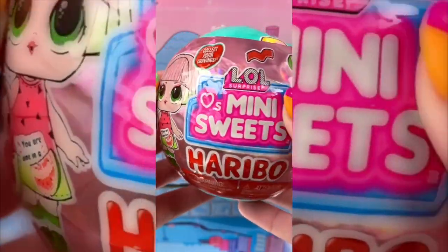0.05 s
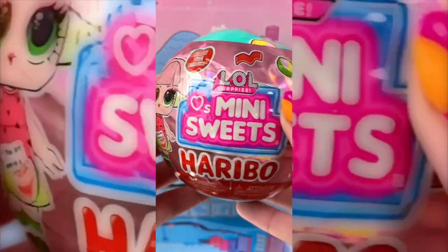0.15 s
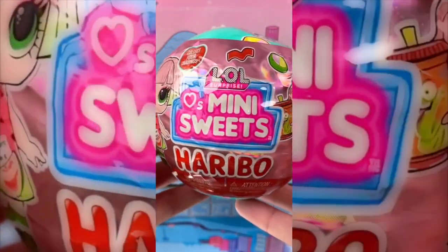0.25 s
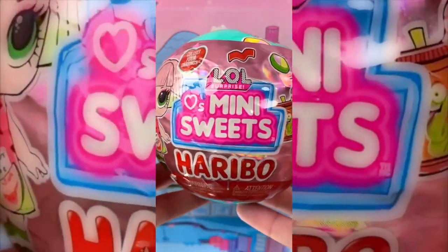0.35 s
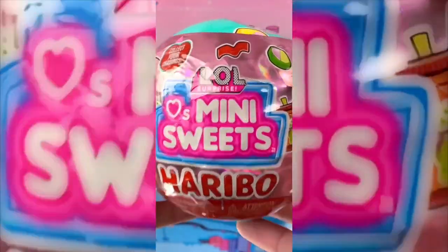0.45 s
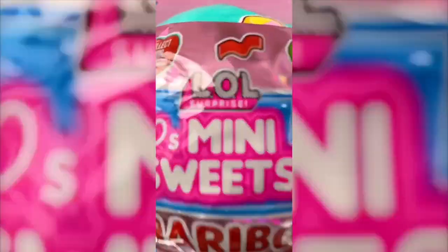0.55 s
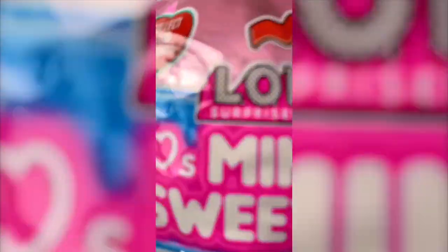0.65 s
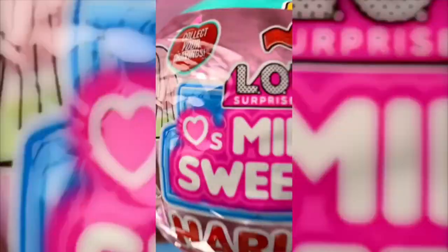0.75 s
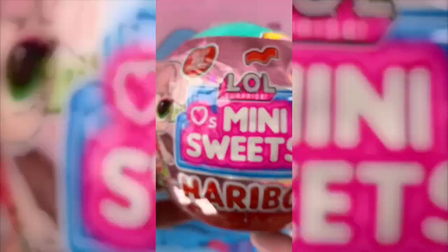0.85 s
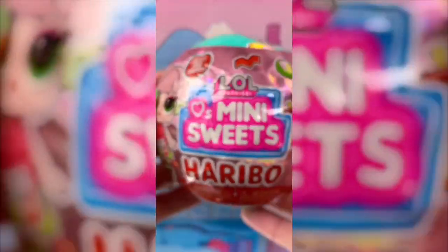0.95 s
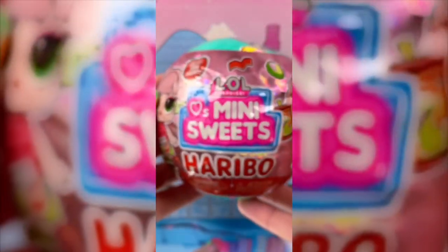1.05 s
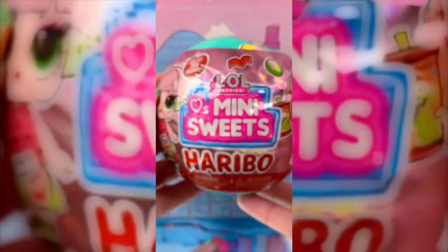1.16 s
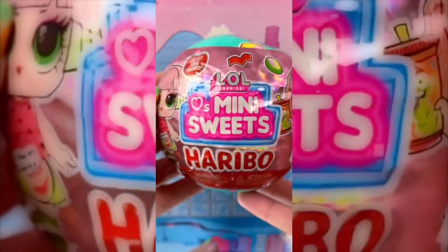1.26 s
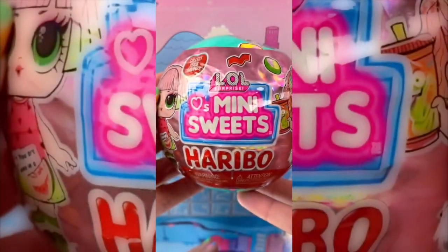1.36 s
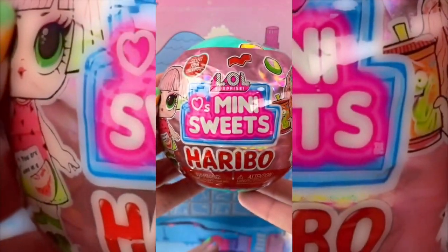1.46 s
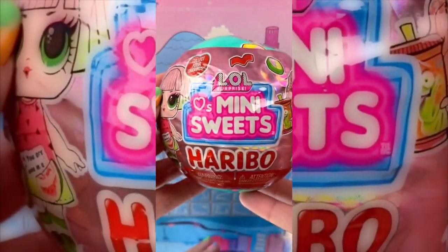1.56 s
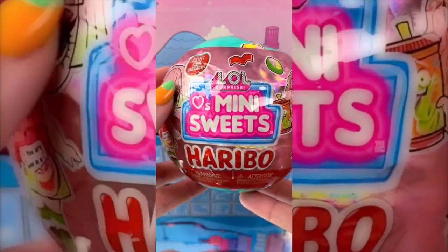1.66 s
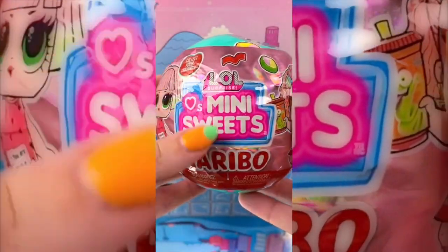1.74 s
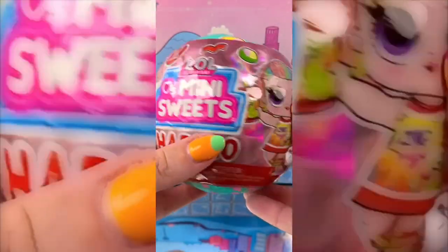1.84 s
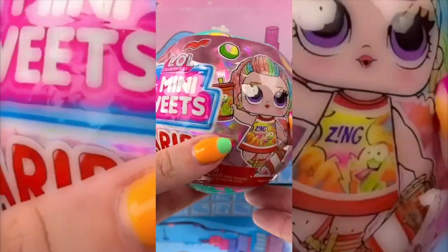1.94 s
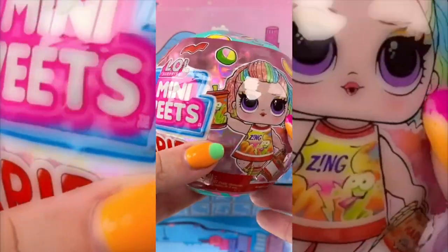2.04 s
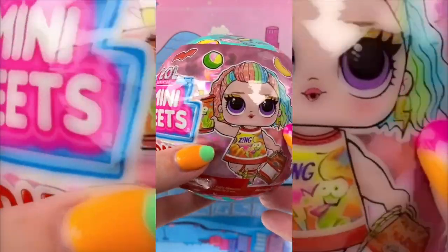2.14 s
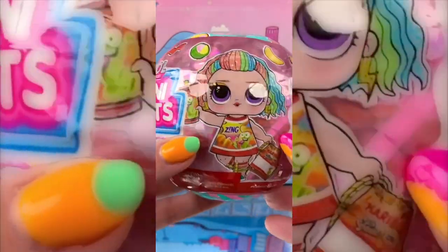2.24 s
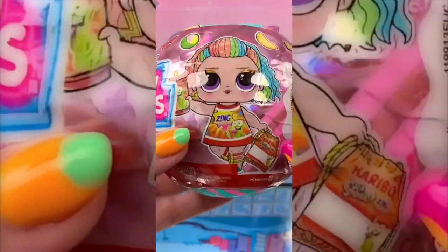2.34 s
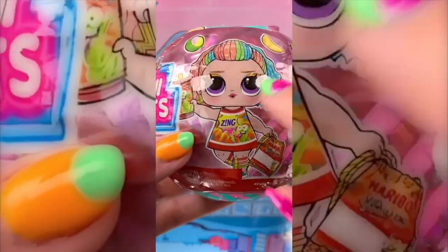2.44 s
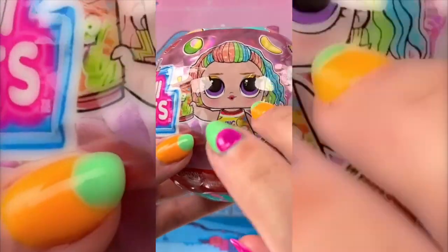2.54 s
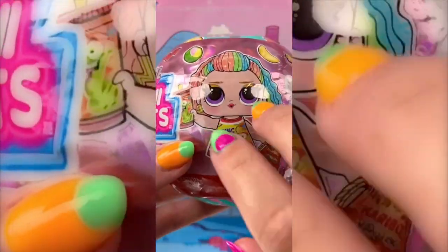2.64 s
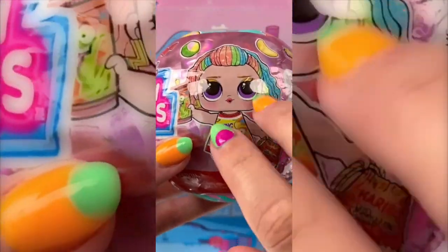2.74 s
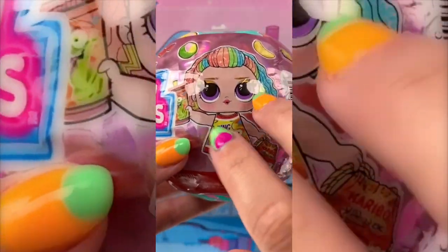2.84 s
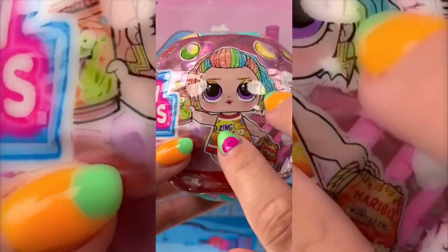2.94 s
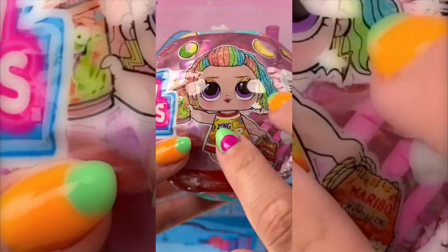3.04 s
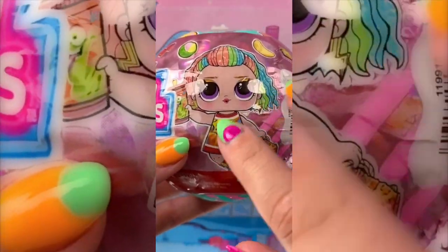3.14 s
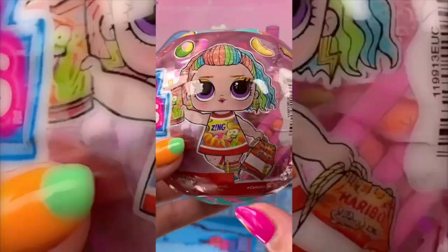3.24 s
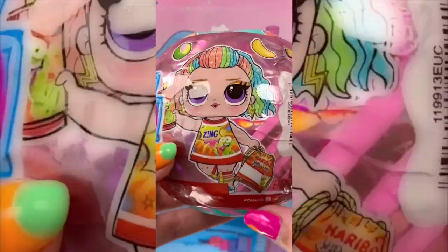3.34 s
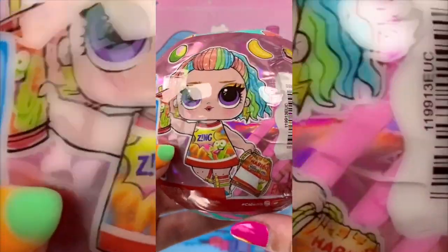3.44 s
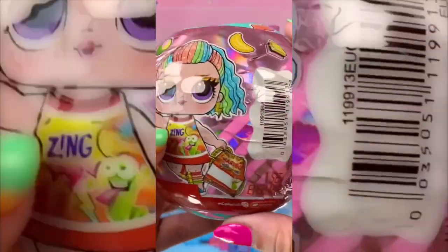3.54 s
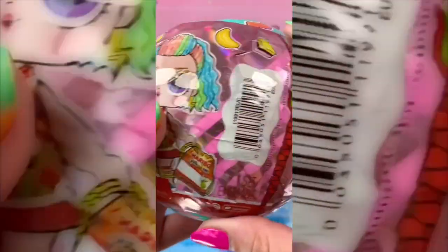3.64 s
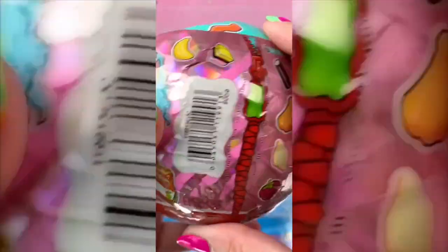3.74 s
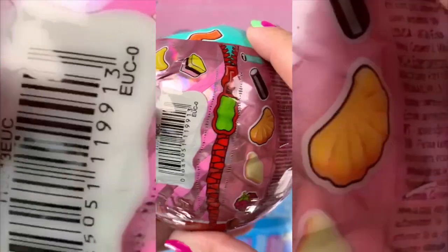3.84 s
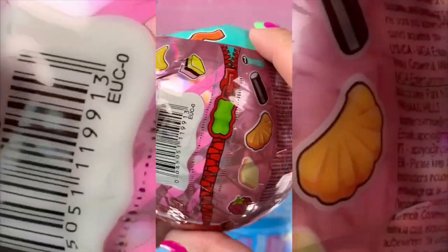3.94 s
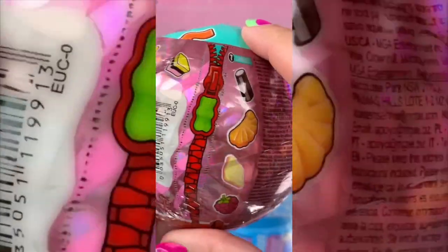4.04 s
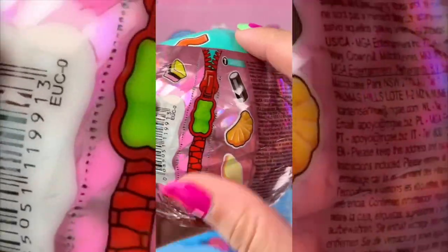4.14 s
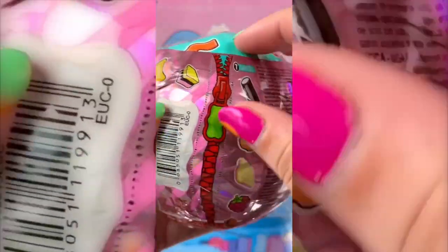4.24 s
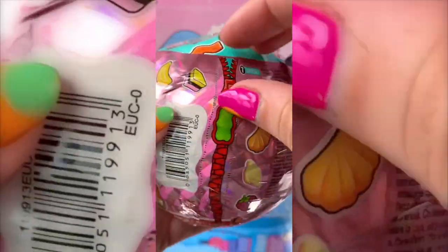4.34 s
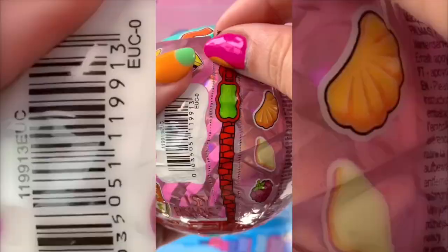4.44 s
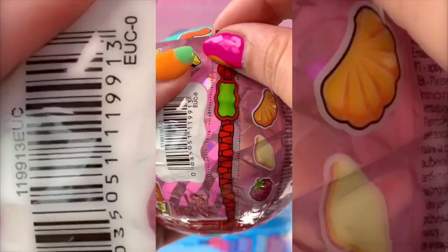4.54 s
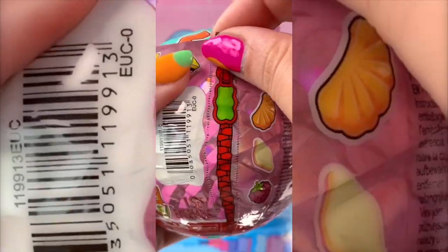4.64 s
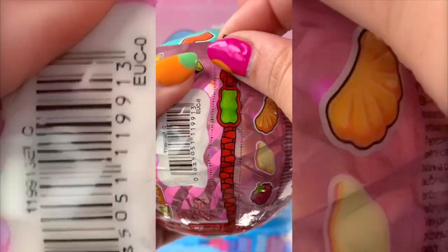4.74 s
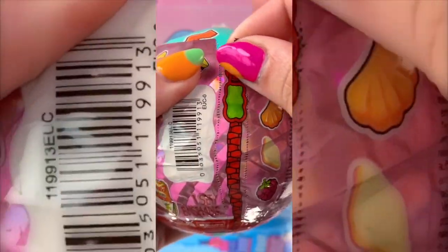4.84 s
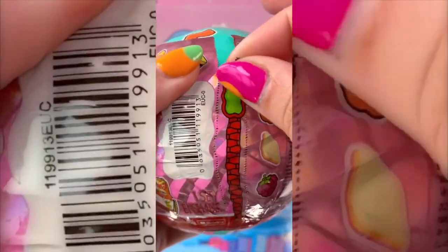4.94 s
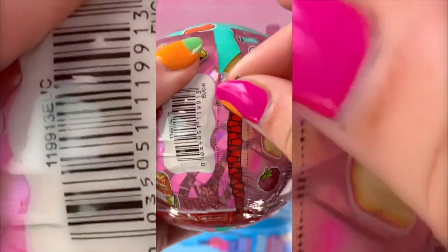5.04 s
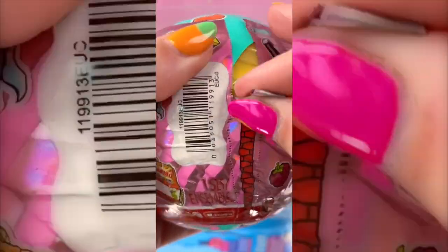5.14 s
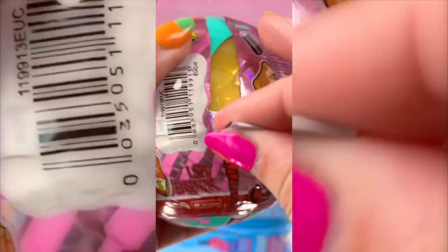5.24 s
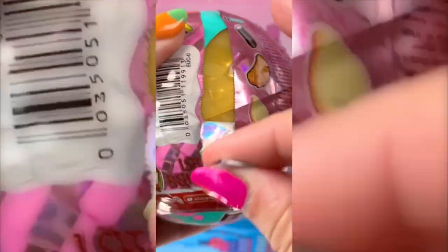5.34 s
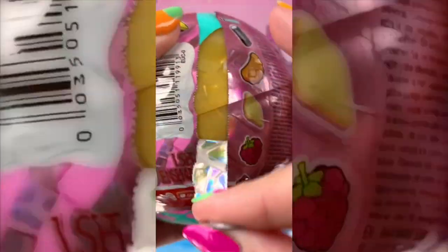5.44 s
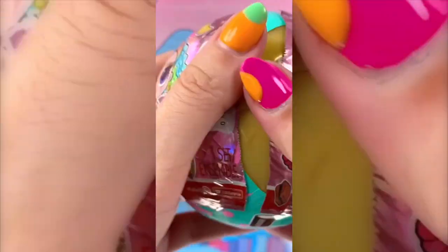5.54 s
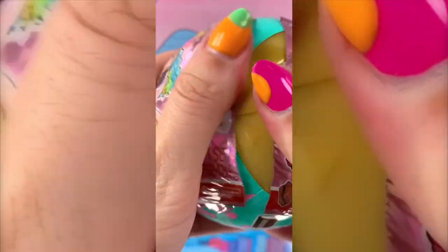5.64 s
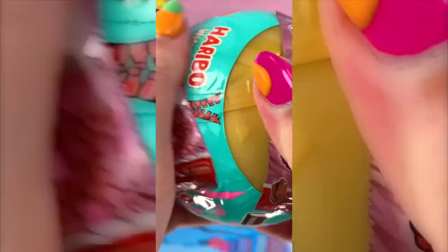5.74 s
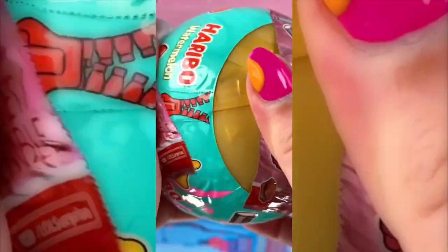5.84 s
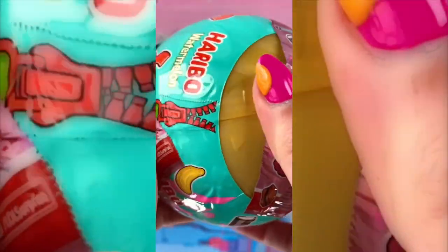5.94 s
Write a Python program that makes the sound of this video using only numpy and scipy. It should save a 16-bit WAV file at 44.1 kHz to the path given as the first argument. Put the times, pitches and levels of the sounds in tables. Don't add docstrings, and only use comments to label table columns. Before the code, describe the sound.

Plastic film faintly rubs and ticks, four hard nail taps ring a hollow ball, then a perforated strip rips open in crackling bursts.

```python
import sys
import numpy as np
from scipy import signal
from scipy.fft import rfft, irfft, next_fast_len
from scipy.io import wavfile
from scipy.ndimage import uniform_filter1d

SR = 44100
rng = np.random.default_rng(int(sys.argv[2]) if len(sys.argv) > 2 else 0)


def pcm_store(signal):
    levels = np.round(np.clip(np.atleast_2d(signal), -1, 1) * 32767)
    wavfile.write(sys.argv[1], SR, levels.astype(np.int16).T)


def to_linear_factor(level_db):
    exponent = np.asarray(level_db, float) / 20
    return 10 ** exponent


N = 264159


def in_time(rows, off=-120):
    s, *columns = np.transpose(rows)
    return [np.interp(np.arange(N) / SR, s, c, left=off, right=off) for c in columns]


def rms_one(x):
    return x / np.sqrt(np.mean(x ** 2) + 1e-20)


def peak_one(x):
    return x / np.sqrt(2 * uniform_filter1d(x ** 2, size=30).max())


def at_hz(points, hz, axis=1):
    points = np.array(points)
    return np.interp(np.log(hz), np.log(points[:, 0]), points[:, axis])


def coloured(points, x, lead=0):
    size = next_fast_len(x.shape[-1] + 8192)
    hz = np.fft.rfftfreq(size, 1 / SR) + 1
    turn = np.exp(1j * lead(hz) if lead else 0)
    return irfft(rfft(x, size) * to_linear_factor(at_hz(points, hz)) * turn, size)[..., :x.shape[-1]]


def cut(x, hz, kind, order=2):
    return signal.sosfilt(signal.butter(order, hz, kind, fs=SR, output="sos"), x)


def resonance(x, hz, width_hz):
    r = np.exp(-np.pi * width_hz / SR)
    gain = (1 - r * r) / 2
    return signal.lfilter([gain, 0, -gain], [1, -2 * r * np.cos(2 * np.pi * hz / SR), r * r], x)


def body(x, modes):
    return sum((-1) ** k * to_linear_factor(db) * resonance(x, hz, width) for k, (hz, width, db) in enumerate(modes))


def drift(rate_hz):
    steps = rng.standard_normal(int(N / SR * rate_hz) + 2)
    return np.interp(np.arange(N) / SR * rate_hz, np.arange(len(steps)), steps)


def swells(rows, rise_s, release_s):
    gains = np.zeros((len(rows[0]) - 2, N))
    for start, end, *dbs in rows:
        span = slice(int(start * SR), min(int((end + 12 * release_s) * SR), N))
        t = np.arange(span.start, span.stop) / SR
        shape = np.clip((t - start) / rise_s, 0, 1) * np.exp(-np.maximum(t - end, 0) / release_s)
        gains[:, span] += to_linear_factor(np.array(dbs))[:, None] * shape
    return gains


def dying_noise(bands, seconds):
    t, out = np.arange(int(seconds * SR)) / SR, 0
    edges = 25 * 2 ** np.arange(0, 9.6, .5)
    white = rng.standard_normal((2, len(t)))
    for k, (low, high) in enumerate(zip(edges, edges[1:])):
        hz = np.sqrt(low * high)
        gain_db = at_hz(bands, hz) - 60 * t / at_hz(bands, hz, axis=2)
        out = out + to_linear_factor(gain_db) * rms_one(cut(white[k % 2], [low, high], "band"))
    return out


def bumps(rows, cycles, puff_db):
    out, t = np.zeros(N + 4000), np.arange(4000) / SR
    for s, db, hz in rows:
        puff = to_linear_factor(puff_db) * cut(rng.standard_normal(len(t)), 3.8 * hz, "low")
        fade = np.exp(-t * hz / cycles) * np.clip(t * hz, 0, 1)
        out[round(s * SR):][:len(t)] += to_linear_factor(db) * (np.sin(2 * np.pi * hz * t) + puff) * fade
    return out[:N]


# time in seconds, level in dB.
RUMBLE = [(0.0, -51), (0.83, -51), (1.72, -49.5), (3.39, -47.5), (3.94, -46.5), (4.6, -50), (4.95, -40.5),
          (5.29, -43.5), (5.41, -57), (5.75, -48), (6.0, -50)]
# frequency in Hz, level in dB per Hz.
RUMBLE_COLOUR = [(12, -50), (20, -23.5), (42, -5.5), (65, 6), (83, 0.5), (97, -16), (125, -4.5), (145, -15),
                 (184, -10.5), (214, -18.5), (246, -17), (334, -28), (550, -54.5), (720, -88.5),
                 (1210, -120)]
# frequency in Hz, width in Hz, level in dB.
HUM = [(59, 3, -61.5), (237.1, 1.5, -69)]
# time in seconds, level in dB.
DRONE = [
    (3.3, -74),
    (3.4, -55),
    (3.8, -52),
    (3.92, -76),
]
# frequency in Hz, level in dB per Hz.
AIR = [(300, -10.5), (450, 33), (600, -14.5), (1200, -15), (3000, -13.5), (8000, -24.5), (16000, -40)]
DRONE_HZ, AIR_DB = 184, -84


def background():
    rumble = rms_one(coloured(RUMBLE_COLOUR, rng.standard_normal(N)))
    hum = sum(to_linear_factor(db) * rms_one(resonance(rng.standard_normal(N), hz, width)) for hz, width, db in HUM)
    drone_phase = 2 * np.pi * np.cumsum(DRONE_HZ + 2.9 * drift(4.9)) / SR
    drone = to_linear_factor(in_time(DRONE)[0] + drift(4.7)) * np.sin(drone_phase)
    air = to_linear_factor(AIR_DB) * rms_one(cut(coloured(AIR, rng.standard_normal(N)), 300, "high"))
    return to_linear_factor(in_time(RUMBLE, off=-50)[0]) * rumble + hum + drone + air


# start in seconds, end in seconds, body in dB, hiss in dB,
# slack-film notes in dB against the body.
SLIDES = [(0, 0.03, -67, -66, 6), (0.091, 0.112, -51.5, -77, -1), (0.298, 0.413, -75.5, -67, 1.5),
          (0.431, 0.59, -65.5, -70, 0.5), (1.483, 1.522, -75, -59, 2), (1.558, 1.616, -66.5, -63, 5),
          (1.62, 1.666, -73, -66, 3), (1.68, 1.72, -85, -82, 9), (1.748, 1.807, -62.5, -61, 0),
          (1.793, 1.869, -63, -52, 1.5), (1.894, 1.97, -68.5, -66, 5), (1.978, 2.08, -79, -72, 0.5),
          (2.086, 2.197, -85.5, -88, 11), (2.17, 2.237, -74, -80, -2), (2.225, 2.295, -69, -63.5, 5),
          (3.09, 3.25, -93, -97, 9), (3.277, 3.372, -66.5, -56.5, -3), (3.378, 3.418, -66, -59, 3),
          (3.42, 3.473, -61.5, -57, 6), (3.493, 3.548, -76.5, -65, 0.5), (3.566, 3.63, -79, -57.5, -1),
          (3.617, 3.697, -71, -57, 2.5), (3.69, 3.783, -74, -61.5, 2), (3.887, 3.998, -75, -68, 5),
          (3.988, 4.025, -59.5, -47, -0.5), (4.061, 4.102, -77.5, -74, 5), (4.133, 4.26, -67, -57.5, 2),
          (4.294, 4.387, -69, -65.5, 3.5), (4.439, 4.473, -64, -58, -2)]
# frequency in Hz, width in Hz, level in dB.
SLIDE_BODY = [(2410, 380, -8.5), (2950, 570, -7.5), (4220, 1430, -5), (6420, 430, -16), (790, 390, -11.5)]
HISS_COLOUR = [(3000, -33.0), (6500, -15.5), (11000, -4.5), (16000, 3.0)]  # (Hz, dB)


def slides():
    strokes = [(max(start - .01, 0), end - .02, db, hiss_db, db + slack_db)
               for start, end, db, hiss_db, slack_db in SLIDES]
    body_gain, hiss_gain, slack_gain = swells(strokes, rise_s=0.023, release_s=0.018)
    rub = rng.standard_normal(N) * to_linear_factor(3.5 * drift(400))
    rings = [to_linear_factor(db + 3.0 * drift(14)) * resonance(rub, hz, width) for hz, width, db in SLIDE_BODY]
    slack = to_linear_factor(-5) * slack_gain * rms_one(rings[0] - rings[1])
    taut = to_linear_factor(-1.0) * body_gain * rms_one(sum(rings[2:]))
    hiss = hiss_gain * rms_one(coloured(HISS_COLOUR, rng.standard_normal(N)))
    return (slack + taut) * to_linear_factor(2.2 * drift(80)) + hiss * to_linear_factor(1.6 * drift(40))


# time in seconds, stretch of
SPREAD = [(4.5, 0.89, 0.47), (4.9, 0.88, 1.15), (4.92, 0.9, 1.9), (5.0, 0.94, 2.7), (5.2, 1.22, 6.2),
          (5.4, 1.21, 4.4), (5.5, 1.27, 4.7), (5.6, 0.93, 2.7), (6, 1.1, 2.4)]


def snaps(rows, flap, rise_ms, ring_ms, crack_ms, width_hz, broad_db, pop_db):
    size = 1200
    out, t_ms = np.zeros(N + size), np.arange(size) / SR * 1000
    shape = (len(rows), 2, size)
    slips = rng.standard_normal(shape) * rng.exponential(1, shape)
    flap_s, flap_hz, flap_db = np.transpose(flap)
    spread_s, spread, slower = np.transpose(SPREAD)
    rise = 1 - np.exp(-t_ms / rise_ms)
    for (s, ring_db, crack_db, hz), (film_slips, crack_slips) in zip(rows, slips):
        stretch, slow = np.interp(s, spread_s, spread), np.interp(s, spread_s, slower)
        swell = (1 - np.exp(-t_ms / (rise_ms * slow))) ** 2
        spray = film_slips * swell * np.exp(-t_ms / (ring_ms * stretch))
        ring = resonance(spray, hz, width_hz) + to_linear_factor(broad_db) * cut(spray, [1800, 6500], "band")
        drum_hz = np.interp(s, flap_s, flap_hz)
        drum = peak_one(resonance(spray, drum_hz, 90 + 0.086 * drum_hz))
        drum = to_linear_factor(np.interp(s, flap_s, flap_db)) * drum
        pop = to_linear_factor(pop_db) * peak_one(cut(np.abs(spray), [400, 1300], "band")) / stretch ** 3
        sizzle = swell * np.exp(-t_ms / (crack_ms * stretch))
        tick = 10.3 / slow ** 0.3 * rise * np.exp(-t_ms / 0.112)
        crack = cut(crack_slips * (sizzle + tick), 7030, "high", order=4)
        at = round(s * SR)
        out[at:at + size] += to_linear_factor(ring_db) * (peak_one(ring) + drum + pop) + to_linear_factor(crack_db) * peak_one(crack)
    return out[:N]


# time in seconds, film ring in dB, bright crack in dB,
# film ring in Hz.
TICKS = [(0.092, -47.5, -67, 1170), (0.138, -51.5, -89, 770), (0.297, -52, -50, 3880),
         (0.462, -43, -26, 4560), (1.498, -61, -49, 2820), (1.566, -46, -80, 2740), (1.668, -56, -85, 2950),
         (1.736, -44, -73, 4360), (1.783, -49, -60, 3040), (1.872, -53.5, -71, 719), (1.955, -58, -78, 650),
         (2.067, -60, -101, 616), (3.193, -63, -64, 3600), (3.277, -43, -59, 2550),
         (3.381, -52.5, -45.5, 4940), (3.429, -50, -40, 2680), (3.465, -53, -32.5, 3805),
         (3.841, -66, -54, 3070), (3.911, -54, -69, 2460), (4.309, -62, -48, 2470),
         (4.446, -52.5, -55, 3920), (4.472, -47, -50, 3860)]


def film_ticks():
    return snaps(TICKS, [(0, 2970, -8.5)], rise_ms=0.56, ring_ms=2.1, crack_ms=0.3,
                 width_hz=250, broad_db=-21.5, pop_db=-8.0)


# frequency in Hz, width in Hz, level in dB.
BALL = [(600, 500, -6), (1180, 330, -4.5), (2400, 240, -4.5), (3650, 580, -8.5), (4486, 270, 0.5),
        (5430, 300, -5), (6500, 1200, -7.5), (8200, 1400, -11), (9800, 1500, -16.5), (14840, 1700, -17.5)]


def tick_shell():
    clicks = np.zeros(N)
    for s, ring_db, _, _ in TICKS:
        clicks[round(s * SR) + 15] = to_linear_factor(ring_db + 13)
    return body(clicks, BALL)


# frequency in Hz, onset level in dB, t60 in seconds.
KNOCK = [(40, -44, 1.97), (121, -35, 0.72), (300, -46.5, 0.63), (830, -46.5, 0.77), (1950, -54.5, 0.76),
         (3500, -51.5, 0.42), (5200, -61, 0.18), (7400, -57.5, 0.36), (13900, -62, 0.13)]
KNOCK_S = .709


def knock():
    tail = dying_noise(KNOCK, seconds=1.2)
    t = np.arange(len(tail)) / SR
    push = to_linear_factor(-21) * np.sin(2 * np.pi * 105 * t) * np.exp(-t / .018)
    tail = tail * (1 - np.exp(-t / .002)) - push
    return np.pad(tail, (round(KNOCK_S * SR), N))[:N]


# time in seconds, level in dB, frequency in Hz.
BOUNCES = [
    (.724, -33.5, 1010),
    (.803, -42, 920),
    (.85, -43.5, 1200),
    (.985, -60, 910),
]


def settling():
    return bumps(BOUNCES, cycles=4.1, puff_db=2.0)


# frequency in Hz, level in dB.
SHADOW = [(1300, -2), (1600, -11.5), (1800, -0.5)]


def shadow(x):
    return coloured(SHADOW, x)


# time in seconds, peak in dB, bright crack in dB, lower modes in dB.
TAPS = [
    (2.494, -14, -19, -1.5),
    (2.6193, -11, -15, 1),
    (2.7051, -10.5, -21, 0),
    (2.8137, -11, -13.5, 2.5),
]


def taps():
    heard, radiated = np.zeros(N), np.zeros(N)
    for s, db, crack_db, low_db in TAPS:
        at, tip, blow = round(s * SR), np.zeros(900), np.zeros(900)
        tip[:60] = rng.standard_normal(60) * np.exp(-np.arange(60) / 8.0)
        blow[[3, 32]] = .3, 1
        low = to_linear_factor(low_db) * body(blow, BALL[:3])
        high = body(blow + 0.13 * peak_one(tip), BALL[3:])
        ring = peak_one(shadow(low - high))
        heard[at:at + len(tip)] += to_linear_factor(db) * ring + to_linear_factor(crack_db) * peak_one(cut(tip, 7000, "high"))
        radiated[at] = to_linear_factor(db)
    to_walls = to_linear_factor(19) * resonance(radiated, 5300, 2400) + to_linear_factor(8.0) * cut(radiated, 600, "high")
    return heard, to_walls


# time in seconds, level in dB, frequency in Hz.
THUMPS = [(2.494, -38, 300), (2.62, -28, 260), (2.705, -33.5, 238), (2.813, -33, 245), (5.454, -22.5, 70.7),
          (5.4495, -27, 430), (5.753, -24, 900), (5.779, -22, 890), (5.7974, -21.5, 890),
          (5.9505, -12.5, 693), (5.976, -19, 228)]


def soft_blows():
    return bumps(THUMPS, cycles=1.1, puff_db=-3.5)


# time in seconds, film ring in dB, bright crack in dB.
BRIDGES = [(4.5102, -26, -18), (4.5477, -17.5, -6), (4.5782, -16, -6.5), (4.5857, -17, -7),
           (4.6318, -16, -9.5), (4.648, -16, -8), (4.7167, -17.5, -14), (4.7176, -16, -11.5),
           (4.7607, -16.5, -20), (4.77, -19, -11.5), (4.7831, -16.5, -16.5), (4.797, -16.5, -6),
           (4.8119, -19, -15), (4.8173, -14.5, -8.5), (4.8271, -19, -12), (4.8363, -18, -5),
           (4.8432, -16.5, -3), (4.8534, -19, -7), (4.8603, -20, -3), (4.8801, -16.5, -1.5),
           (4.8951, -17.5, -28),
           (4.922, -14.5, -10.5), (4.9234, -24.5, -9), (4.9348, -13.5, -9), (4.9484, -15.5, -9),
        (4.963, -18, -8), (4.977, -17.5, -9), (4.9803, -23, -6), (5.009, -26, -37), (5.0158, -22, -10),
        (5.0271, -21.5, -20), (5.0354, -21.5, -7), (5.0522, -18, -7), (5.0665, -19, -7), (5.073, -21.5, -8),
        (5.079, -17, -9), (5.0916, -17.5, -17), (5.103, -17, -6), (5.116, -16.5, -7), (5.1242, -15.5, -9),
        (5.14, -16.5, -9.5), (5.1514, -29, -28),
           (5.1732, -21, -24), (5.178, -29, -15), (5.1822, -19.5, -11), (5.1864, -20, -11), (5.194, -22, -7),
       (5.1986, -17, -16), (5.2083, -20, -14), (5.2199, -12.5, -13), (5.2306, -21, -14),
       (5.2374, -14.5, -8), (5.2505, -20, -1), (5.259, -22.5, -14), (5.2618, -19, -9), (5.2773, -21.5, -7),
       (5.294, -12, -8), (5.3038, -15, -8), (5.3068, -21, -8), (5.3138, -14.5, -1), (5.319, -11.5, -11),
       (5.3248, -14, -10), (5.333, -14, -8), (5.333, -17, -12), (5.3378, -13.5, -2.5), (5.3451, -16.5, -8),
       (5.3509, -19, -11), (5.3562, -14, -7), (5.3597, -16.5, -6), (5.3681, -14.5, -6.5), (5.4069, -17, -8),
       (5.4141, -16, -2), (5.425, -25, -12), (5.4308, -21.5, -10), (5.4425, -17, -5.5), (5.449, -24, -8),
       (5.4556, -19, -17), (5.4676, -20, -22), (5.4714, -18.5, -8.5), (5.4988, -39, -25)]
# time in seconds, film ring in dB, bright crack in dB.
PEEL = [(5.5613, -28, -14.5), (5.5657, -31, -16), (5.5782, -13, -6), (5.5882, -16, -13),
        (5.594, -19.5, -8.5), (5.6005, -9.5, -8), (5.608, -17.5, -16), (5.6263, -14.5, -31),
        (5.6444, -5.5, -22), (5.6524, -25, -38), (5.6608, -1.5, -6.5), (5.6778, -18, -36),
        (5.6863, -22, -39), (5.7025, -3, 3), (5.7113, -20, -34), (5.7176, -26, -38), (5.723, -5, -23),
        (5.7269, -12, -9), (5.7334, -15, -35), (5.7528, -34, -46), (5.779, -32.5, -52), (5.7968, -30, -48),
        (5.827, -14, -8.5), (5.8412, -26.5, -41), (5.866, -33, -52), (5.8933, -20, -25),
        (5.8957, -15.5, -20), (5.9295, -9, -11), (5.9457, -7.5, -6), (5.9504, -13, -3.5), (5.9605, -6, -18),
        (5.972, -3, 0), (5.9807, -19, -7)]
# start in seconds, film ring in Hz, drum in Hz, drum fall in octaves per s,
# drum in dB against the snap.
GRIPS = [(4.5, 4500, 880, 0.1, -14), (4.75, 5060, 920, 0.1, -15.5), (4.911, 4330, 4900, 11.4, 2),
         (5.0, 3870, 2520, 5.3, -4), (5.04, 3680, 1980, 3.4, 1), (5.085, 3480, 1260, 1.7, -9.5),
         (5.165, 3700, 3650, 1.4, -5.5), (5.205, 3500, 2180, 0.3, -19), (5.245, 3600, 2100, 1.4, -3),
         (5.3, 4300, 2100, 6.9, -2.5), (5.349, 4350, 1400, 2.0, -2), (5.4, 3730, 1280, 1.3, -4),
         (5.445, 4540, 626, 3.0, -17), (5.55, 5920, 2030, 0.086, -26), (5.574, 4300, 2020, 0.1, -7.5),
         (5.615, 2180, 3600, 0.12, -13), (5.81, 2360, 4700, 0.1, -5.5), (5.94, 2180, 5020, 0.1, -5)]
DRUM_FADE_DB_PER_S, RING_SCATTER_OCTAVES = 65, 0.12


def tearing():
    s, ring_db, crack_db = np.transpose(BRIDGES + PEEL)
    grips = np.array(GRIPS)
    start, ring_hz, drum_hz, fall, drum_db = grips[np.searchsorted(grips[:, 0], s) - 1].T
    ring_hz = ring_hz * 2 ** (RING_SCATTER_OCTAVES * rng.standard_normal(len(s)))
    held_s = s - start
    flap = np.transpose([s, drum_hz * 2 ** (-fall * held_s), drum_db - DRUM_FADE_DB_PER_S * held_s])
    rows = np.transpose([s, ring_db, crack_db, ring_hz])
    return snaps(rows, flap, rise_ms=0.063, ring_ms=2.0, crack_ms=1.41,
                 width_hz=460, broad_db=-6.5, pop_db=-18)


# time in seconds, level in dB.
HANDLING = [
    (4.72, -69),
    (4.8, -48),
    (5.05, -54),
    (5.3, -48),
    (5.47, -40),
    (5.52, -87),
]


def handling():
    lumps = rms_one(cut(rng.standard_normal(N), [70, 220], "band")) * to_linear_factor(3.4 * drift(30))
    return to_linear_factor(in_time(HANDLING)[0]) * lumps


# start in seconds, length in seconds, level in dB, brightness in dB.
LOADS = [
    (5.006, 0.137, -46.5, 7),
    (5.16, 0.15, -59, -4),
    (5.305, 0.057, -42, -1),
    (5.411, 0.071, -37.5, 0),
    (5.568, 0.058, -27.5, 2),
    (5.62, 0.144, -45, 0),
    (5.794, 0.26, -44, 0.5),
    (5.948, .05, -32, 3),
]
LOAD_RISE_S, LOAD_RELEASE_S = 0.032, 0.0066


def crackle():
    strokes = [(s, s + length, db, db + bright_db) for s, length, db, bright_db in LOADS]
    level, bright = swells(strokes, LOAD_RISE_S, LOAD_RELEASE_S)
    born = rng.random(N) < 2500 * to_linear_factor(5 * drift(120)) / SR
    creases = born * rng.standard_normal(N) * to_linear_factor(2.2 * np.minimum(rng.exponential(1, N), 4))
    modes = [(1200, 1700, 8.0), (2100, 230, -22), (3600, 2500, 5), (5200, 720, -13)]  # (Hz, width Hz, dB)
    film = rms_one(body(creases, modes))
    return level * film + bright * rms_one(cut(creases, 8200, "high", order=4))


# frequency in Hz, level in dB, t60 in seconds.
ROOM = [(300, -34, 0.14), (1500, -30, 0.19), (4500, -30.5, 0.27), (9200, -34.5, 0.27), (15000, -25.5, 0.16)]


def room(x):
    echo = np.pad(dying_noise(ROOM, seconds=0.86), (round(.0035 * SR), 0)) / np.sqrt(0.019 * SR)
    return signal.fftconvolve(x, echo)[:N]


# frequency in Hz, level in dB.
APART = [(60, -66), (160, -42), (300, -22), (700, -17), (2000, -17), (5000, -10), (15000, -8)]


def apart(x):
    return coloured(APART, x * drift(500)) * [[1], [-1]]


# frequency in Hz, lead in radians.
LEFT_LEAD = [(0, 0), (200, -.02), (500, -.42), (1300, -.15), (2500, .5), (3400, .1), (4400, .75),
             (5100, .2), (6700, 2.65), (7900, 3.8), (9500, 5.7), (11100, 6.7), (12850, 9.0), (14200, 9.9),
             (16700, 13)]


def left_lead(hz):
    gap = uniform_filter1d(np.interp(hz, *np.transpose(LEFT_LEAD)), size=600)
    return .5 * gap * [[1], [-1]]


def scene():
    house = background()
    ticks = film_ticks()
    tear = shadow(tearing())
    film = tear + ticks + tick_shell() + shadow(crackle()) + slides()
    nail, nail_to_walls = taps()
    shaken = knock() + settling() + handling()
    near = film + nail + soft_blows() + room(film + nail_to_walls) + house
    unlike = apart(tear + ticks + .5 * nail + house)
    return coloured([(1, 0)], near + unlike, left_lead) + shaken


def low_pass(x):
    return signal.sosfilt(signal.butter(12, 17150, fs=SR, output="sos"), x)


# frequency in Hz, level in dB.
MIC = [(15600, 0), (15950, -13), (16500, -19), (16800, -45), (17200, -90)]


def record(dry):
    rounded = .85 * np.tanh(dry / .85)
    return low_pass(coloured(MIC, rounded))


dry = scene()
out = record(dry)
pcm_store(out)
```